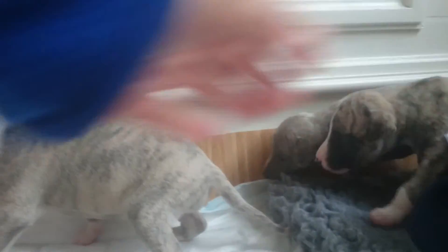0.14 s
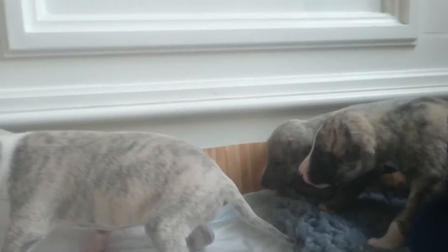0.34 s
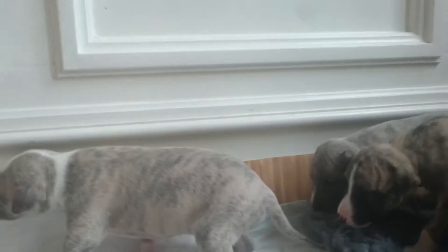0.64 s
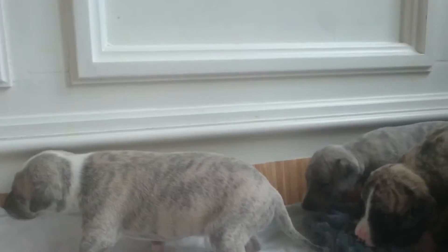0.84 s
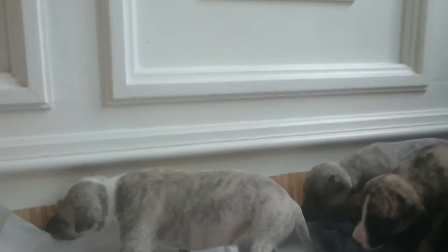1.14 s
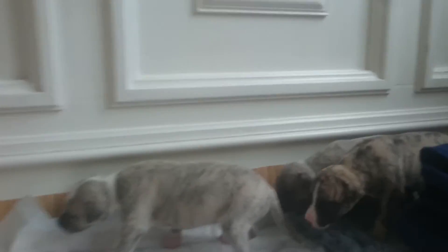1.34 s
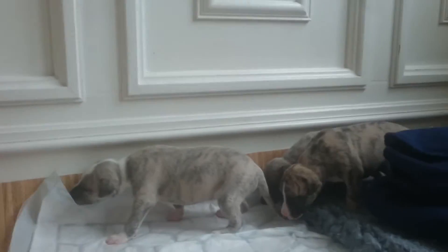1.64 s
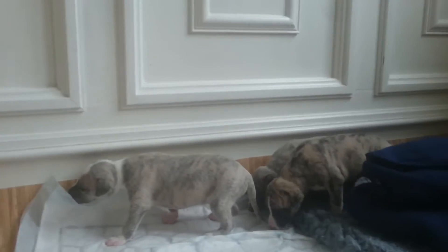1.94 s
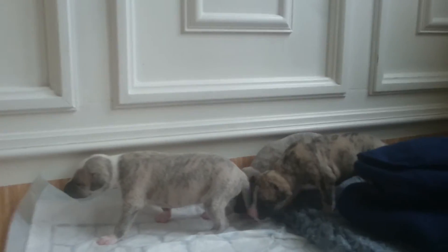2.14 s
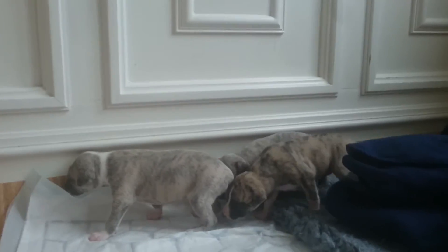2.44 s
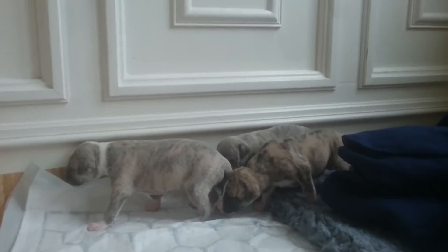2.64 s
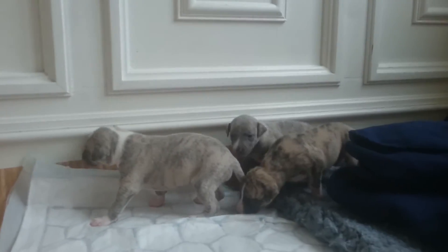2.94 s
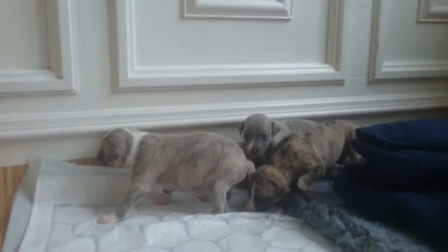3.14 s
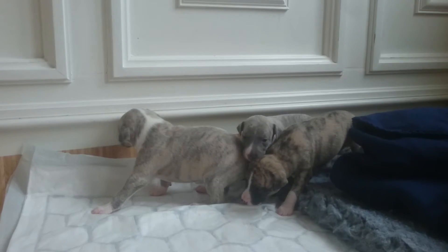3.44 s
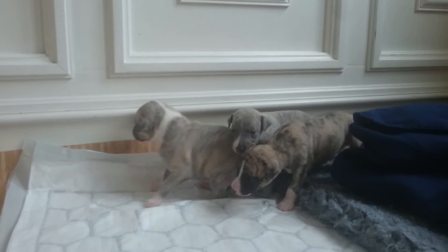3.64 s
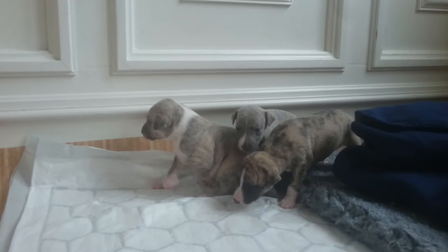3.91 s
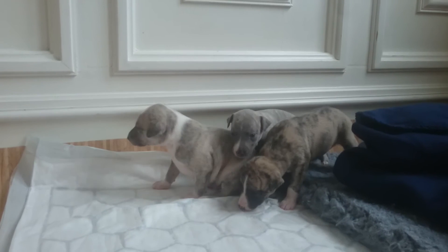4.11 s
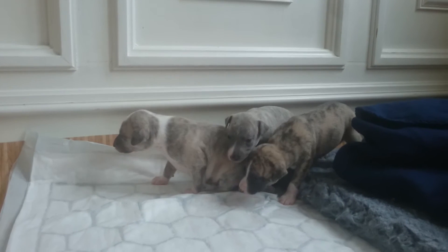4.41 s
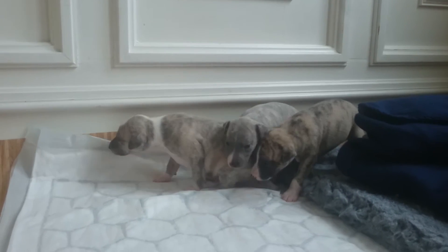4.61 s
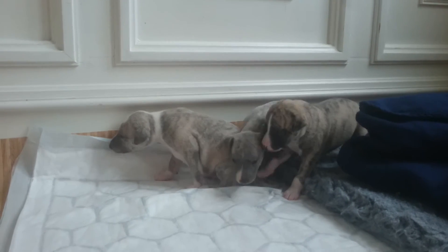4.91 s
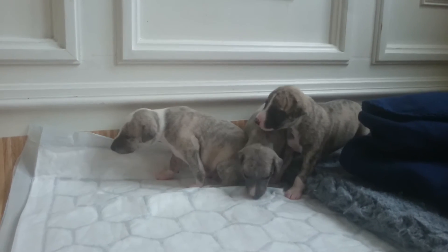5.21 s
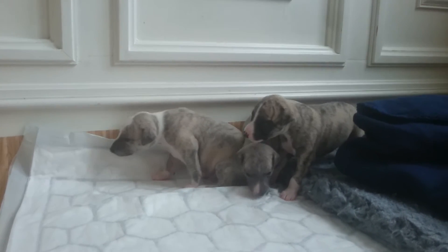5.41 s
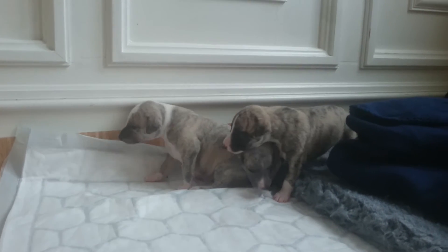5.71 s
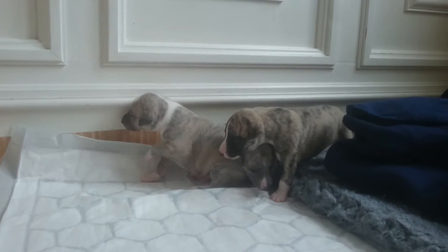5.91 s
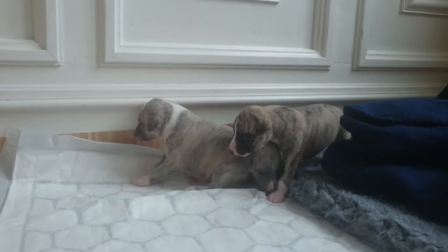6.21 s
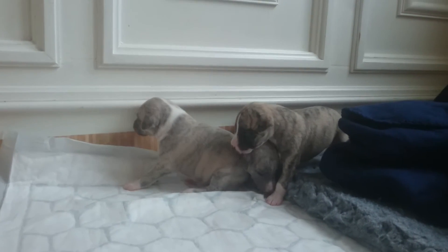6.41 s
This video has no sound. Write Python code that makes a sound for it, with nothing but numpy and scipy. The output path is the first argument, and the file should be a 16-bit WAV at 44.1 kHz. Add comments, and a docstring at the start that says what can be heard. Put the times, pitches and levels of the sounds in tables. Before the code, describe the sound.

Crockery clinks and rattles in the background as small puppies give thin, breathy squeaks and shuffle over crinkling paper indoors.

```python
"""A hard-walled room, where three young puppies whimper and whine as they shuffle over a paper pad.
Their small vocal folds quiver into thin, breathy squeaks; the paper rustles and snaps under their paws.
Further off, crockery and cutlery are handled: each piece rattles, rings and fills the room, and heavy
ones thud on a hollow worktop. The hand-held stereo microphone adds soft bumps and a faint hiss."""
import sys
import numpy as np
from scipy import signal
from scipy.fft import rfft, irfft, next_fast_len
from scipy.io import wavfile

SR = 44100
rng = np.random.default_rng(int(sys.argv[2]) if len(sys.argv) > 2 else 0)


def int16_out(signal):
    """Quantize to a 16-bit WAV file."""
    q = np.round(np.clip(np.atleast_2d(signal).T, -1, 1) * 32767)
    wavfile.write(sys.argv[1], SR, q.astype(np.int16))


N = 288855
TIME = np.arange(N) / SR
TAIL = int(.8 * SR)  # reverb length in samples

# The room's reverb. Each row: frequency in Hz, seconds to die away by 60 dB.
ROOM_DECAY = [(200, 0.57), (5000, 0.43), (15000, 0.36)]
# Stereo widening. Each row: frequency in Hz, side gain in dB.
SIDE_EQ = [(250, 9), (500, 7.5), (1000, 0.5)]
# Colour of the noise floor. Each row: frequency in Hz, gain in dB.
HISS_EQ = [(24, -57), (45, -1.5), (143, -12.5), (327, -14), (710, -10.5), (4760, -13), (15800, -23)]
# Nudges on the microphone. Each row: start in seconds, strength of the push in dB.
MIC_NUDGES = [(0.963, -44), (1.363, -44), (2.319, -47), (4.279, -43), (4.435, -40), (5.215, -44),
              (5.362, -38)]
# Modes of the microphone's body. Each row: frequency in Hz, gain in dB, 60 dB decay in seconds.
MIC_MODES = [(52.7, -9.5, 0.55), (90, 3, 0.068), (163, -2.5, 0.07), (313, 11, 0.0055)]
# Heavy pieces set down. Each row: start in seconds, level in dB, contact length in seconds.
WORKTOP_THUDS = [(4.447, -43, 0.054), (5.439, -46, 0.055)]
# Crockery knocks. Each row: start in seconds, relative level in dB, rattle length in seconds,
# hardness from 0 (flat clunk) to 1 (sharp tick on a rim), favoured frequency in Hz.
CROCKERY_KNOCKS = [(0.025, -42, 0.019, 0.18, 4030), (0.109, -42.5, 0.018, 0.18, 3240),
                   (0.235, -42.5, 0.032, 0.25, 5400), (1.211, -35.5, 0.032, 0.14, 4400),
                   (1.415, -39.5, 0.034, 0.05, 1460), (1.639, -34, 0.023, 0.29, 4750),
                   (2.117, -41, 0.024, 0.11, 1310), (2.186, -38, 0.011, 0.8, 6300),
                   (2.238, -38.5, 0.011, 0.18, 3550), (2.773, -35.5, 0.022, 0.5, 5370),
                   (2.884, -30, 0.021, 0.68, 1920), (2.948, -34.5, 0.019, 0.57, 1870),
                   (3.001, -40.5, 0.02, 0.35, 1860), (3.125, -39.5, 0.0045, 0.32, 2680),
                   (3.143, -38, 0.035, 0.3, 4650), (3.19, -31, 0.013, 0.4, 5170),
                   (3.228, -32, 0.037, 0.3, 1420), (3.334, -38.5, 0.022, 0.21, 1270),
                   (3.431, -32.5, 0.009, 1, 5130), (3.539, -38, 0.0031, 1, 5300),
                   (4.226, -40.5, 0.015, 0.16, 4700), (4.278, -33.5, 0.016, 0.2, 3470),
                   (4.393, -35, 0.047, 0.22, 1400), (4.449, -24.5, 0.021, 0.35, 4850),
                   (4.468, -27, 0.0066, 0.78, 3800), (4.494, -30, .017, 0.18, 3930),
                   (5.377, -31.5, 0.016, 0.08, 5100)]
# The piece being handled. Each row: start in seconds, name, ring over clack in dB.
PIECE_IN_HAND = [(0, "bowl", -32), (1.2, "bowl", -2.5), (1.35, "cup", -21), (2.7, "plate", -6),
                 (3.4, "plate", 2.5), (3.5, "bowl", -16), (4.4, "bowl", -5.5), (5, "cup", 2.5)]
# Ringing modes of bowl, cup and plate. Each row: frequency in Hz, relative level in dB.
PIECE_MODES = { "bowl": [(1425, -11), (2143, -28), (2455, -4.5), (3079, -7), (3203, 2), (3565, -10),
               (3870, 0), (4131, -8), (4549, -21), (4650, -16), (4940, -4), (5650, -2.5), (5858, -5)],
               "cup": [(1695, -12.5), (3946, -10), (4020, -2.5), (5040, -4), (5825, -8.5), (13590, -16)],
               "plate": [(1950, -12), (2985, -6.5), (3995, 1.5), (5145, 4.5), (6443, -7.5), (7880, -13),
               (9440, -12.5), (14825, -10)]}
# Colour of the clack's dense, short-lived modes. Each row: frequency in Hz, gain in dB.
CLACK_EQ = [(120, -21.5), (330, -22.5), (700, -10.5), (1300, -5.5), (1900, -1.5), (3500, -3), (5000, 1.5),
            (6000, -2.5), (6900, -13), (11000, -22.5), (15000, -21.5)]
# Colour of the rubbed pad. Each row: frequency in Hz, gain in dB.
PAD_EQ = [(150, -34), (600, -19.5), (900, -8), (2800, -11.5), (4500, -4.5), (5700, -0.5), (7000, -12),
          (12000, -25), (15000, -13.5)]
# Paws and fur shift on the pad. Each row: start of the hold in seconds, its length in seconds, level in dB.
PAW_SHUFFLES = [(.01, 0.0091, -41), (0.67, 0.24, -43.5), (1.808, 0.027, -47), (1.967, 0.21, -38),
                (3.557, 0.081, -39.5), (6.053, 0.044, -52)]
# Creases snapping. Each row: start in seconds, dry peak in dB, centre in Hz, decay time in seconds.
PAD_SNAPS = [(0.7092, -20, 5500, 0.00078), (0.8475, -29, 3830, 0.0007), (0.9095, -24, 5860, 0.00072),
             (1.193, -32, 4400, 0.0046), (1.973, -34, 14200, 0.018), (2.113, -28, 13100, 0.0012),
             (2.134, -31, 9000, 0.0046), (2.156, -23.5, 7800, 0.0012), (4.6918, -25, 5200, 0.00087)]
# The mouth's response to a cry's two lowest harmonics. Each row: frequency in Hz, gain in dB.
MOUTH_EQ = [(480, -1.5), (620, 4), (750, 7.5), (1250, 3.5), (1950, 6), (2500, -10)]
# The throat's response to the upper overtones. Each row: frequency in Hz, gain in dB.
THROAT_EQ = [(1500, 11), (2400, -11), (4400, -15), (5600, 8.5), (6800, -13), (8500, -12), (12000, -33)]
# Short whimpers. Each row: start in seconds, length in seconds, mid pitch in Hz, glide in octaves,
# relative level in dB.
WHIMPER_CUES = [(0.248, 0.029, 590, 0.033, -55.5), (0.496, 0.056, 752, 0.034, -57.5),
                (0.685, 0.092, 769, -0.021, -58.5), (0.768, 0.046, 679, -0.5, -53.5),
                (0.979, 0.037, 712.6, -0.34, -55.5), (1.009, 0.048, 468, -0.36, -58.5),
                (1.197, 0.052, 759, -0.27, -57.5), (1.692, 0.058, 715, -0.22, -58.5),
                (2.236, 0.034, 770, -0.68, -55), (3.22, 0.048, 681, -0.12, -55.5),
                (3.499, 0.044, 705, -0.15, -63), (3.712, 0.031, 646, -0.69, -59.5),
                (3.917, 0.025, 647, -0.7, -59.5), (4.068, 0.054, 756, 0.098, -61),
                (4.786, 0.06, 721, -0.064, -56.5), (4.993, 0.044, 687, 0.044, -63.5),
                (5.017, 0.099, 823.3, 0.29, -56.5), (5.291, 0.079, 677, -0.07, -57),
                (5.54, 0.06, 840, 0.16, -56), (5.684, 0.045, 731, 0.17, -61.5),
                (5.777, 0.057, 783, -0.23, -56), (5.919, 0.047, 713, -0.15, -67.5),
                (6.154, 0.036, 734, -0.15, -64.5)]
# Long thin whines, one curve each. Each point: time in seconds, pitch in Hz, relative level in dB.
WHINE_CURVES = [
    [(.035, 763, -54), (.075, 1008, -52.5), (.15, 943, -67)],
    [(.318, 1150, -68), (.345, 1062, -58), (.375, 1101, -63.5), (.41, 1010, -59), (.5, 938, -62)],
    [(3.946, 1150, -63.5), (4.03, 970, -65), (4.11, 895, -65), (4.18, 905, -71)],
    [(5.956, 1142, -73), (6.02, 1239, -67.5), (6.11, 1076, -61.5), (6.2, 1092, -76.5)],
    [(6.3, 1136, -76), (6.355, 1340, -61), (6.41, 1009, -64.5), (6.45, 911, -64.5), (6.53, 951, -70)],
]


def from_db(db):
    """Decibels to gain."""
    return 10 ** (np.asarray(db) / 20)


def rms_one(x):
    """Scale to an rms of 1."""
    return x / np.sqrt(np.mean(x ** 2) + 1e-20)


def at_hz(points, hz):
    """Read a curve on a logarithmic frequency axis."""
    points = np.array(points)
    return np.interp(np.log(np.maximum(hz, 1)), np.log(points[:, 0]), points[:, 1])


def colour(x, eq):
    """Minimum-phase EQ through the given (Hz, dB) points."""
    size = 2 * next_fast_len(x.shape[-1] // 2 + 1024)
    cepstrum = irfft(np.log(from_db(at_hz(eq, np.fft.rfftfreq(size, 1 / SR)))))
    cepstrum[1:size // 2] *= 2
    cepstrum[size // 2 + 1:] = 0
    return irfft(rfft(x, size) * np.exp(rfft(cepstrum)))[..., :x.shape[-1]]


def drift(n, per_s):
    """A random wobble of spread about 1, heading for a new value per_s times a second."""
    return np.interp(np.arange(n) * per_s / SR, np.arange(4000), rng.standard_normal(4000))


def ring(x, hz, t60):
    """One mode: a unit click sets a sine of height 1 ringing."""
    radius, angle = from_db(-60 / (t60 * SR)), 2 * np.pi * hz / SR
    return signal.lfilter([0, np.sin(angle)], [1, -2 * radius * np.cos(angle), radius ** 2], x + 1e-18)


def add(out, start, sound):
    """Mix a sound in at start seconds."""
    i = max(int(start * SR), 0)
    out[..., i:i + sound.shape[-1]] += sound[..., :N - i]


def room(direct_db, lag_s=0., decay_share=1):
    """Stereo reverb: the straight path, lag_s later on the right, and a tail whose treble dies first."""
    t, hz = TIME[:TAIL], np.fft.rfftfreq(TAIL, 1 / SR)
    white, tail = rfft(rng.standard_normal((2, TAIL))), 0
    for centre, t60 in ROOM_DECAY:
        band = at_hz([(f, f == centre) for f, _ in ROOM_DECAY], hz)
        tail = tail + irfft(white * band, TAIL) * from_db(-60 * t / (t60 * decay_share))
    response = rms_one(tail * np.minimum(t / 0.00093, 1)) / np.sqrt(TAIL)
    response[[0, 1], [0, int(lag_s * SR)]] += from_db(direct_db)
    return rms_one(response) / np.sqrt(TAIL)


def heard(x, response):
    """Send a sound through the room to the microphone pair."""
    return signal.fftconvolve(np.atleast_2d(x), response, axes=-1)[:, :x.shape[-1]]


def hiss(level_db=-58):
    """A steady bed of room tone and microphone hiss."""
    return from_db(level_db) * rms_one(colour(rng.standard_normal((2, N)), HISS_EQ))


def bumps(right_share=0.062):
    """Nudges set the microphone's body swaying: soft, low bumps, mostly on the left."""
    pushes = np.zeros(N)
    for start, push_db in MIC_NUDGES:
        add(pushes, start, from_db([push_db]))
    sway = sum(from_db(db) * ring(pushes, hz, t60) for hz, db, t60 in MIC_MODES)
    return sway * np.array([[1], [right_share]])


def contacts(length, per_s=1100, spread_db=4.5, rise_share=0.53):
    """Two hard surfaces meet and chatter unevenly, pressing harder after the first touch."""
    t = TIME[:TAIL]
    touching = (rng.random(TAIL) < per_s / SR) * (t < length)
    touches = touching * rng.choice([-1, 1], TAIL) + (t == 0)
    sizes = from_db(spread_db * np.clip(rng.standard_normal(TAIL), -2, 1))
    pressure = np.minimum(0.47 + t / (rise_share * length), 1)
    return touches * sizes * pressure


def worktop(boom_hz=292, t60_s=0.0085, upper_db=3.5, upper_hz=600):
    """Under a heavy piece the hollow board booms briefly in two low, well-damped modes."""
    out = np.zeros((2, N))
    for start, level_db, length in WORKTOP_THUDS:
        force = heard(contacts(length), room(direct_db=-29))
        radiated = np.gradient(force, axis=-1)  # a small board radiates little bass
        boom = ring(radiated, boom_hz, t60_s) + from_db(upper_db) * ring(radiated, upper_hz, t60_s / 2)
        add(out, start, from_db(level_db) * boom / np.std(boom[:, :int(length * SR)]))
    return out


def crockery(gain_db=2.5, pan_db=.5, focus_db=6, focus_oct=.38, strike_spread_db=2.2, t60_at_4khz_s=.17):
    """Each rattle gives a broad clack and rings the piece's modes; most arrives by way of the walls."""
    out, walls = np.zeros((2, N)), room(direct_db=-10.5, lag_s=.0005)
    low_cut = signal.butter(2, 1200, "high", fs=SR, output="sos")
    for start, knock_db, length, hardness, focus_hz in CROCKERY_KNOCKS:
        _, piece, ring_db = [row for row in PIECE_IN_HAND if row[0] <= start][-1]
        # the spot that is struck favours one region of the spectrum
        focus = [(focus_hz / 2 ** focus_oct, 0), (focus_hz, focus_db), (focus_hz * 2 ** focus_oct, 0)]
        force = heard(contacts(length), walls)
        radiated = signal.sosfilt(low_cut, force)  # small pieces radiate no bass
        tones = 0
        for hz, db in PIECE_MODES[piece]:
            # each knock shares its energy differently among the modes
            mode_db = db + at_hz(focus, hz) / 2 + rng.normal(0, strike_spread_db)
            t60 = t60_at_4khz_s * (4000 / hz) ** .5
            tones = tones + from_db(mode_db) * rms_one(ring(radiated, hz, t60))
        clack = colour(colour(force, CLACK_EQ), focus)
        attack = slice(int((length + 0.041) * SR))
        tones, clack = tones / np.std(tones[:, attack]), clack / np.std(clack[:, attack])
        # harder knocks trade low clunk for bright edge
        clunk_db, edge_db = 12 - 50.5 * hardness, -7 + 15.5 * hardness
        clack = colour(clack, [(1000, clunk_db), (1900, 0), (6000, 0.0062), (9500, edge_db)])
        ring_gain = from_db(ring_db)
        add(out, start, from_db(knock_db) * (clack + ring_gain * tones) / np.hypot(1, ring_gain))
    return from_db(gain_db) * out * from_db([[-pan_db], [pan_db]])


def grains(per_s, spread_db, clump_db=4.5):
    """Paper fibres catch and slip: tiny clicks that swell in clumps."""
    sizes = from_db(spread_db * np.minimum(rng.exponential(1, N), 4.5)) * rng.choice([-1, 1], N)
    slips = rng.random(N) < per_s / SR
    clumps = from_db(clump_db * (drift(N, 300) + drift(N, 45)))
    return sizes * slips * clumps


def shuffling(fidget_db=-57.5, attack_s=0.13, release_s=0.1):
    """The rustle's envelope: each shuffle swells, holds and dies away over the constant fidgeting."""
    power = from_db(fidget_db) ** 2
    for start, length, rustle_db in PAW_SHUFFLES:
        fade = np.maximum((start - TIME) / attack_s, (TIME - start - length) / release_s)
        power = power + (from_db(rustle_db) * np.exp(-np.clip(fade, 0, 20))) ** 2
    return np.sqrt(power)


def rustle(scuff_db=-11.5, scuff_hz=11500, firm_db=-40, scuff_growth=0.58):
    """Paws rub a stream of grains from the pad; firmer scuffs bring up a sparser, high crackle."""
    close, envelope = room(direct_db=3, lag_s=.0004), shuffling()
    rub = rms_one(colour(heard(grains(per_s=4000, spread_db=0), close), PAD_EQ))
    treble = signal.butter(2, scuff_hz, "high", fs=SR, output="sos")
    crackle = rms_one(signal.sosfilt(treble, heard(grains(per_s=900, spread_db=5), close)))
    scuff = from_db(scuff_db) * (envelope / from_db(firm_db)) ** scuff_growth
    return envelope * (rub + scuff * crackle)


def crinkles(skirt_db=33.5):
    """Creases in the pad snap over close by, each around its own pitch."""
    out, t = np.zeros(N), TIME[:SR // 25]
    for start, peak_db, hz, decay in PAD_SNAPS:
        eq = [(hz / 8, -skirt_db), (hz, 0), (hz * 8, -2 * skirt_db)]
        snap = colour(rng.standard_normal(len(t)) * np.exp(-t / decay), eq)
        add(out, start, from_db(peak_db) * snap / np.abs(snap).max())
    return heard(out, room(direct_db=6))


def cry(pitch, level_db, air_db=-8.5, overtone_db=-3.5, attack_s=0.007, release_s=0.0014):
    """Small vocal folds quiver along a pitch line; air pulses through them and veils the overtones."""
    n = len(pitch)
    t = TIME[:n]
    quiver = .018 * (drift(n, 500) + drift(n, 90))
    pitch = pitch * (1 + quiver)
    phase = 2 * np.pi * np.cumsum(pitch) / SR
    body = sum(from_db(at_hz(MOUTH_EQ, k * pitch)) * np.sin(k * phase) for k in (1, 2))
    overtones = sum(from_db(at_hz(THROAT_EQ, k * pitch)) * np.sin(k * phase) for k in range(3, 15))
    breath = colour(rng.standard_normal(TAIL)[:n], [(100, -48), (3000, -9)] + THROAT_EQ[2:])
    air = rms_one(breath * (1 + np.cos(phase)))
    nasal = from_db(12 * np.log2(pitch / 850))  # high whines go through the nose and whistle
    voice = body + nasal * (from_db(overtone_db) * overtones + from_db(air_db) * air)
    envelope = np.sin(np.pi / 2 * np.clip(np.minimum(t / attack_s, t[::-1] / release_s), 0, 1))
    rasp_db = 2.5 * (drift(n, 70) + drift(n, 450))
    return voice * envelope * from_db(level_db + rasp_db)


def whimpers(scoop_oct=0.051, flick_oct=0.26, flick_s=0.00703, calm_from_s=4.5, calm_swell_db=13):
    """Short cries on a shallow pitch arc: urgent ones flick up as they close, calm ones swell and fade."""
    out = np.zeros(N)
    for start, length, hz, glide, cry_db in WHIMPER_CUES:
        t = TIME[:int(length * SR)]
        along = 2 * t / length - 1
        octaves = glide * along / 2 + scoop_oct * along ** 2
        if start < calm_from_s:
            octaves += flick_oct * np.exp((t - length) / flick_s)
        else:
            cry_db -= calm_swell_db * along ** 2
        add(out, start, cry(hz * 2 ** octaves, cry_db))
    return out


def whines():
    """Long, thin cries that waver and sink."""
    out = np.zeros(N)
    for curve in WHINE_CURVES:
        times, hz, cry_db = np.transpose(curve)
        t = np.arange(times[0], times[-1], 1 / SR)
        add(out, times[0], cry(np.interp(t, times, hz), np.interp(t, times, cry_db)))
    return out


def puppies(gain_db=5):
    """The litter cries from a corner close by, thickened by the room's echoes."""
    return from_db(gain_db) * heard(whimpers() + whines(), room(direct_db=2.5, decay_share=.9))


def scene():
    """Puppies on their pad in front, kitchen work behind, the microphone's own noises underneath."""
    return puppies() + rustle() + crinkles() + crockery() + worktop() + bumps() + hiss()


def record(dry):
    """The close-set microphone pair is widened in the bass; the lowest rumble and the top are cut."""
    middle, side = (dry[0] + dry[1]) / 2, (dry[0] - dry[1]) / 2
    side = irfft(rfft(side) * from_db(at_hz(SIDE_EQ, np.fft.rfftfreq(N, 1 / SR))), N)
    low_cut = signal.butter(4, 38, "high", fs=SR, output="sos")
    high_cut = signal.ellip(12, .2, 80, 15900, fs=SR, output="sos")
    return signal.sosfilt(high_cut, signal.sosfilt(low_cut, [middle + side, middle - side]))


dry = scene()
out = record(dry)
int16_out(out)
```